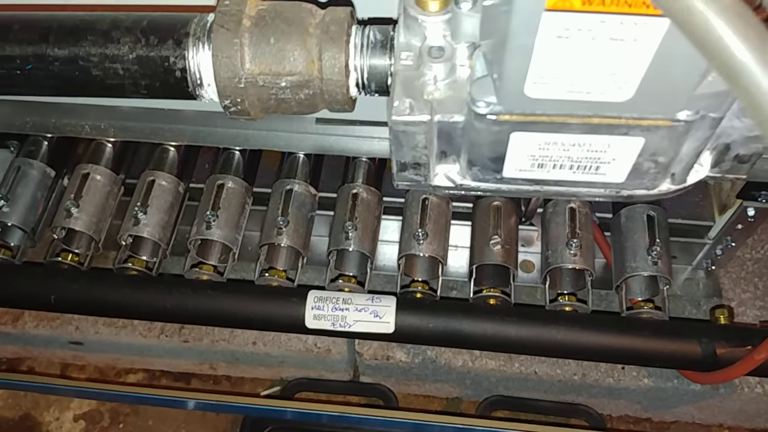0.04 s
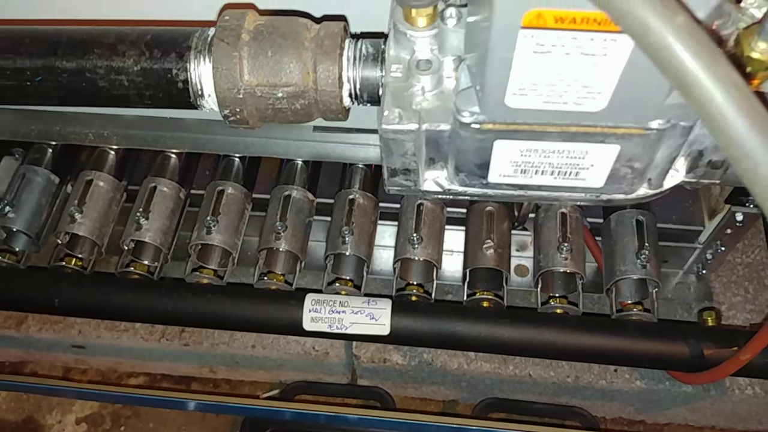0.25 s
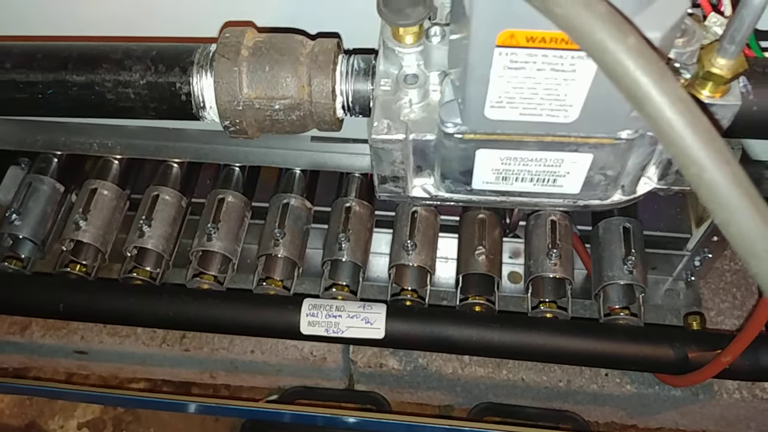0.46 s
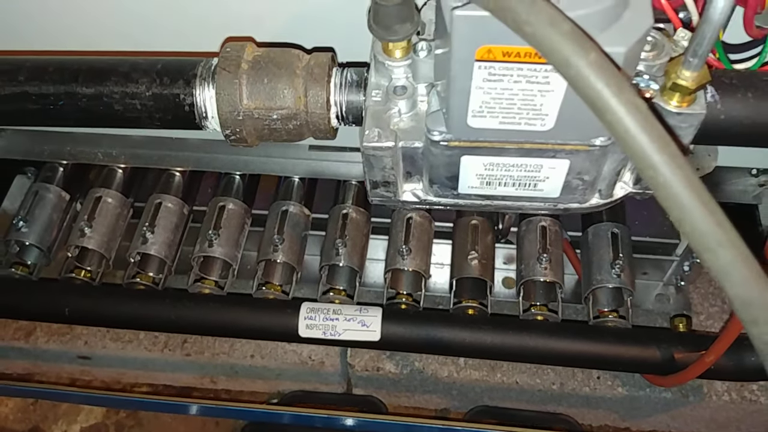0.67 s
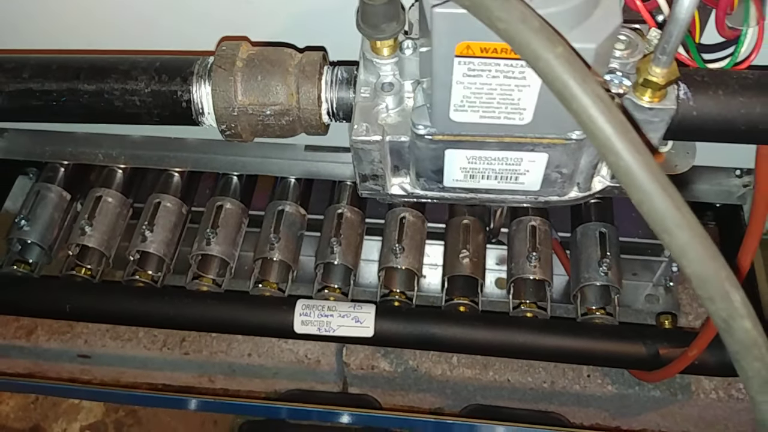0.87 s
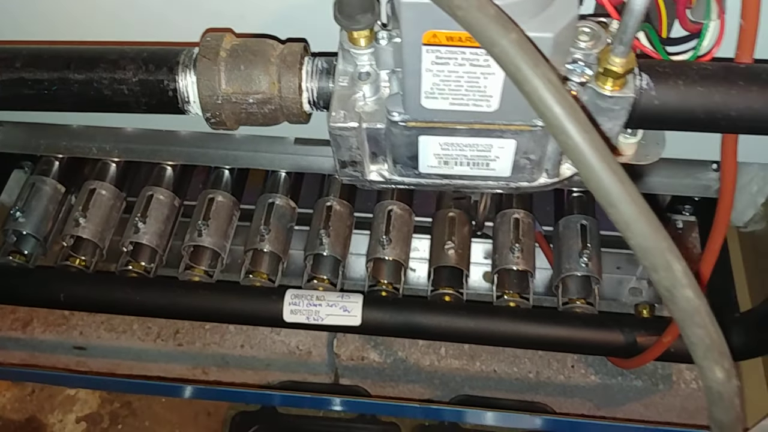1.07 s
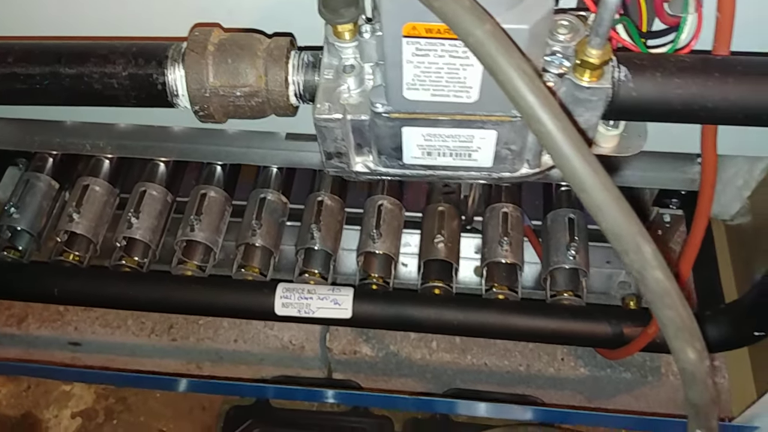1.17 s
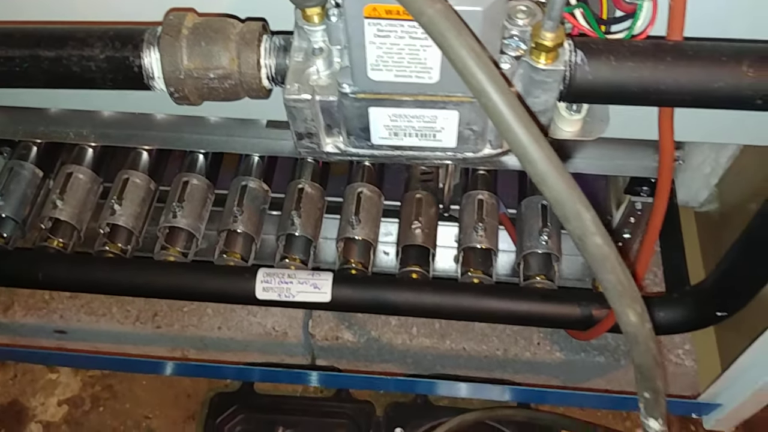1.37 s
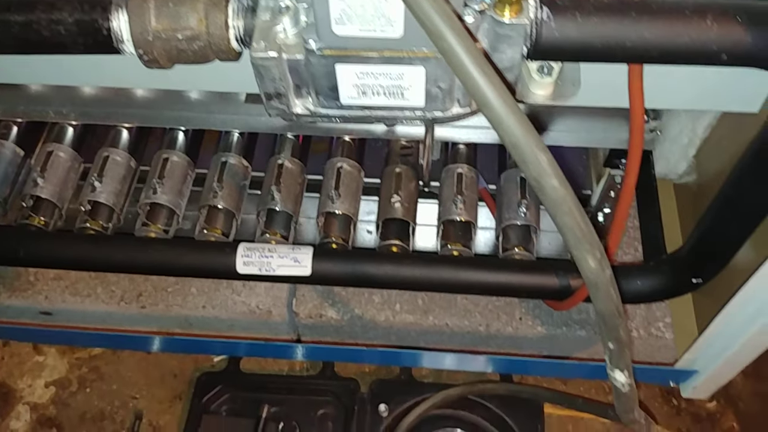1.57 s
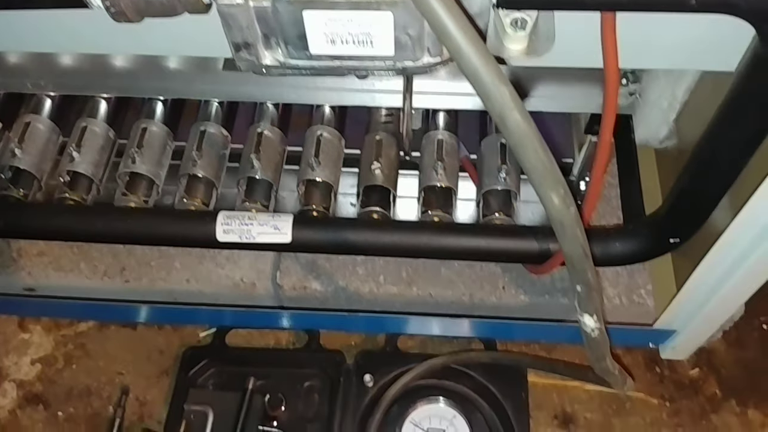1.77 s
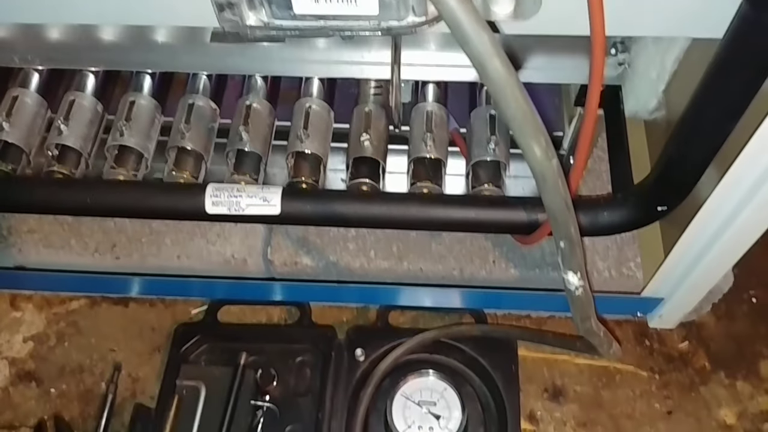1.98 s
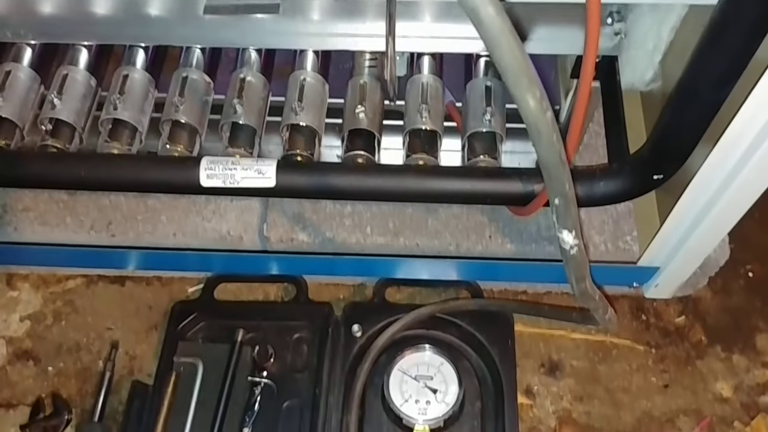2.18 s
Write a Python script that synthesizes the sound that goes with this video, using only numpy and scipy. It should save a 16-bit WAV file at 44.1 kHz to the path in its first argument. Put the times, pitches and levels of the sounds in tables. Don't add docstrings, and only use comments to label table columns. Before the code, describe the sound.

Burners under a boiler fire continuously: low, pulsing rumble in front, weaker breathy intake roar and thin jet hiss behind. The handheld stereo microphone starts close and drifts back, the hiss fading slightly.

```python
import sys
import numpy as np
from scipy import signal
from scipy.fft import rfft, irfft
from scipy.io import wavfile
from scipy.ndimage import uniform_filter1d

SR = 44100
rng = np.random.default_rng(int(sys.argv[2]) if len(sys.argv) > 2 else 0)


def to_linear_factor(level_db):
    exponent = np.asarray(level_db, float) / 20
    return 10 ** exponent


def master(y):
    cut = np.clip(np.atleast_2d(y).T, -1, 1)
    pcm = np.round(cut * 32767)
    wavfile.write(sys.argv[1], SR, pcm.astype(np.int16))


N = 98475
PAD = N + 8192
HZ = np.maximum(np.fft.rfftfreq(PAD, 1 / SR), 1.0)

# time_s, level_db
FLAME_LEVEL = [(0.0, -23.5), (0.11, -22), (0.14, -28), (0.33, -19.5), (0.39, -25.5), (0.5, -21.5),
               (0.65, -25.5), (0.79, -16.5), (0.8, -23.5), (1.17, -23.5), (1.35, -28), (1.38, -22),
               (1.58, -21), (1.6, -26), (2.15, -24.5), (2.23, -23)]
# pitch_hz, level_db (per Hz)
RUMBLE_COLOUR = [(20, -41), (40, -42), (52, -24), (64, 0), (125, -2.5), (170, -19.5), (200, -18),
                 (330, -42.5)]
RUMBLE_PAN_DB, RUMBLE_ALIKE, RUMBLE_LAG_S = -3.0, 1, -0.00012
RUMBLE_EVENED, RUMBLE_EVEN_S = 0.99, 0.07

# time_s, level_db
INTAKE_LEVEL = [
    (0.0, -42.5),
    (0.32, -46),
    (0.33, -40),
    (0.4, -49),
    (0.53, -44),
    (1.3, -47.5),
    (1.35, -45),
    (2.22, -47.5),
    (2.23, -43.5),
]
# pitch_hz, level_db (per Hz)
INTAKE_COLOUR = [(200, -29), (300, -8), (420, -9.5), (900, -14), (1250, -18), (1400, -13), (2300, -16),
                 (3000, -18)]
# pitch_hz, width_hz, level_db
MOUTHS = [(525, 120, -7.5), (713, 230, -3), (935, 53, -3), (1088.5, 176, 1.5), (1216, 47, -4),
          (1652, 116, -9.5)]
# pitch_hz, left_minus_right_db
INTAKE_PAN = [(250, -3), (500, -2.5), (800, -1), (1100, 2), (1650, 3), (2200, 0)]
# pitch_hz, likeness (0-1)
INTAKE_ALIKE = [(250, 0.59), (450, 0.74), (700, 0.76), (900, 0.2), (1150, 0.57), (2000, 0.067)]

# time_s, level_db
JET_LEVEL = [
    (0.0, -36),
    (0.14, -34.5),
    (0.28, -37.5),
    (0.61, -37),
    (2.23, -38.5),
]
# pitch_hz, level_db (per Hz)
JET_COLOUR = [(1800, -24.5), (2700, -16), (3400, -6), (4800, -6), (6200, -2.5), (7500, -2), (8600, -15.5),
              (9600, -41)]
# pitch_hz, left_minus_right_db
JET_PAN = [(2500, 0), (4600, -1), (5200, -5.5), (6100, -7), (6600, 1.5), (7500, 2.5), (8300, -3),
           (9000, -6)]
JET_ALIKE, JET_LAG_S = 0.36, 0.00032
JET_SHARED_DB, JET_OWN_DB, JET_FLICKER_PER_S = 0.45, 1.1, 16
TUBE_HZ, TUBE_ECHO, TUBE_DULL_HZ = 416.9, 0.37, 6900
ORIFICE_HZ = [6680, 7250, 7690]
# width_hz, boost_db
ORIFICES = [(250, 0.5), (130, 5.5), (220, 4.5)]

WHISTLE_HZ = [13148, 13100, 8498]
# width_hz, level_db, left_minus_right_db
WHISTLES = [(90, -66.5, -12), (600, -74, -1), (20, -69, -14)]
# pitch_hz, level_db (per Hz)
AIR_COLOUR = [(8800, -10), (9600, -35), (10600, 4), (11200, -0.5), (13000, 7), (14100, -2), (15000, 1),
              (15700, 6)]
AIR_DB, AIR_PAN_DB, TOP_FLICKER_DB = -61.5, -18, 0.8


def rms_one(x):
    return x / np.sqrt(np.mean(x ** 2) + 1e-20)


def in_time(rows):
    seconds, values = np.transpose(rows)
    return np.interp(np.arange(N) / SR, seconds, values)


def at_hz(points, hz):
    pitches, values = np.transpose(points)
    return np.interp(np.log(hz), np.log(pitches), values)


def colour(points):
    octaves_below = np.maximum(np.log2(points[0][0] / HZ), 0)
    octaves_above = np.maximum(np.log2(HZ / points[-1][0]), 0)
    return to_linear_factor(at_hz(points, HZ) - 60 * (octaves_below + octaves_above))


def hump(hz, width_hz):
    return 1 / np.sqrt(1 + (2 * (HZ - hz) / width_hz) ** 2)


def drift(rate):
    r = np.exp(-80 * np.pi * rate / SR)
    chance = rng.standard_normal(N // 40 + 2002)
    slow = signal.lfilter([1], [1, -2 * r, r * r], chance)[2000:]
    return np.interp(np.arange(N) / 40, np.arange(len(slow)), rms_one(slow - slow.mean()))


def turbulence(gain, pan_db, alike, lag_s, edges, shared_db, own_db, rate):
    common, left, right = rfft(rng.standard_normal((3, PAD)))
    alike = np.clip(alike, 0, 1)
    shared, separate = np.sqrt(alike), np.sqrt(1 - alike)
    late = np.exp(-2j * np.pi * HZ * lag_s)
    pair = np.array([shared * common * late + separate * left,
                     shared * common + separate * right])
    pan = np.array([to_linear_factor(pan_db / 2 + 0 * HZ), to_linear_factor(-pan_db / 2 + 0 * HZ)])
    pair = pair * gain * pan
    place = np.interp(np.log(HZ), np.log(edges), np.arange(len(edges)))
    out = 0
    together = drift(rate / 2)
    for k in range(len(edges)):
        fade = np.cos(np.pi / 2 * np.clip(place - k, -1, 1)) ** 2
        band = irfft(pair * fade, PAD)[:, :N]
        out = out + band * to_linear_factor(shared_db * together + own_db * drift(rate))
    return out / np.sqrt(np.mean(out.mean(axis=0) ** 2))


def flame():
    edges = np.array([39.7, 77.6, 173, 344])
    rumble = turbulence(colour(RUMBLE_COLOUR), RUMBLE_PAN_DB, RUMBLE_ALIKE, RUMBLE_LAG_S, edges,
                        shared_db=3.6, own_db=0.14, rate=11.0)
    size = int(RUMBLE_EVEN_S * SR)
    power = uniform_filter1d(np.mean(rumble ** 2, axis=0), size)
    power = uniform_filter1d(power, size)
    rumble = rumble / np.maximum(power, 1e-6) ** (RUMBLE_EVENED / 2)
    rumble = rumble / np.sqrt(np.mean(rumble.mean(axis=0) ** 2))
    return to_linear_factor(in_time(FLAME_LEVEL)) * rumble


def intake():
    hollows = sum((to_linear_factor(db) * hump(hz, width) ** 2) ** 2 for hz, width, db in MOUTHS)
    gain = np.sqrt(colour(INTAKE_COLOUR) ** 2 + hollows)
    edges = np.geomspace(250, 2500, num=8)
    roar = turbulence(gain, at_hz(INTAKE_PAN, HZ), at_hz(INTAKE_ALIKE, HZ), -0.00006, edges,
                      shared_db=0.37, own_db=1.62, rate=14.2)
    return to_linear_factor(in_time(INTAKE_LEVEL) + 1.08) * roar


def jets():
    echo = TUBE_ECHO / (1 + (HZ / TUBE_DULL_HZ) ** 12)
    tube = 1 / np.abs(1 - echo * np.exp(-2j * np.pi * HZ / TUBE_HZ))
    boost_db = sum(db * hump(hz, width) ** 2 for hz, (width, db) in zip(ORIFICE_HZ, ORIFICES))
    gain = colour(JET_COLOUR) * tube * to_linear_factor(boost_db)
    edges = np.geomspace(2200, 9500, num=10)
    hiss = turbulence(gain, at_hz(JET_PAN, HZ), JET_ALIKE, JET_LAG_S, edges,
                      JET_SHARED_DB, JET_OWN_DB, JET_FLICKER_PER_S)
    return to_linear_factor(in_time(JET_LEVEL)) * hiss


def valve():
    flicker = dict(shared_db=TOP_FLICKER_DB, own_db=TOP_FLICKER_DB, rate=20)
    edges = np.array([9000, 11500, 13800, 15500])
    out = to_linear_factor(AIR_DB) * turbulence(colour(AIR_COLOUR), AIR_PAN_DB, 0.043, 0, edges, **flicker)
    for hz, (width, db, pan_db) in zip(WHISTLE_HZ, WHISTLES):
        whistle = turbulence(hump(hz, width) ** 2, pan_db, 0.088, 0, np.array([hz]), **flicker)
        out = out + to_linear_factor(db) * whistle
    return out


def scene():
    t = np.arange(N) / SR
    to_edge_s = np.minimum(t, t[::-1])
    ease = np.sin(np.pi / 2 * np.clip(to_edge_s / 0.012, 0, 1)) ** 2
    return ease * flame() + intake() + jets() + valve()


def top_cut(x):
    return signal.sosfilt(signal.butter(12, 15750, fs=SR, output="sos"), x)


def record(dry):
    return top_cut(dry)


dry = scene()
out = record(dry)
master(out)
```